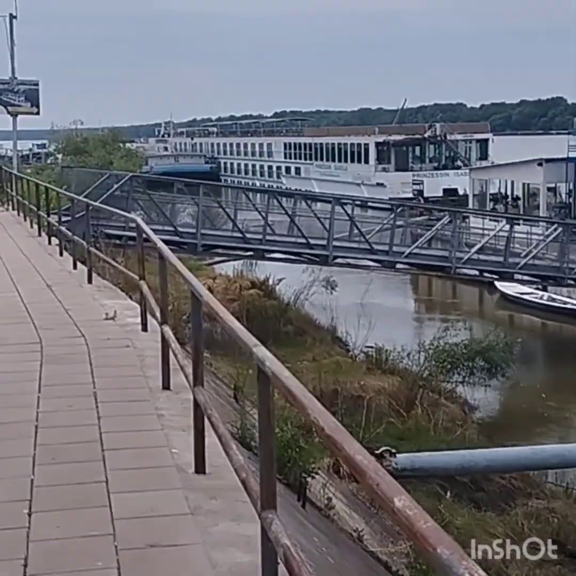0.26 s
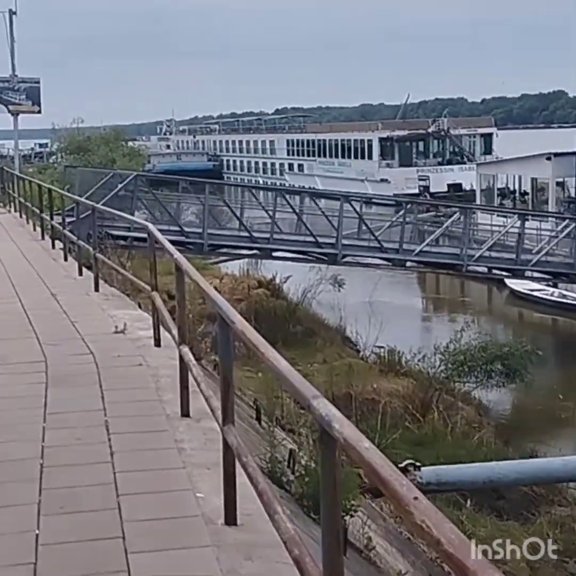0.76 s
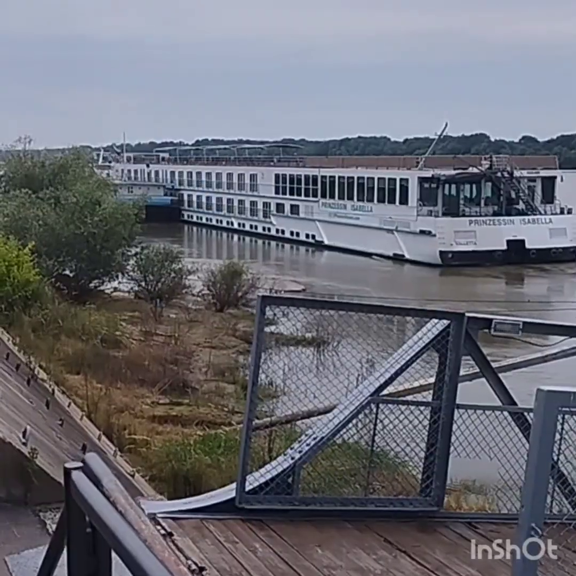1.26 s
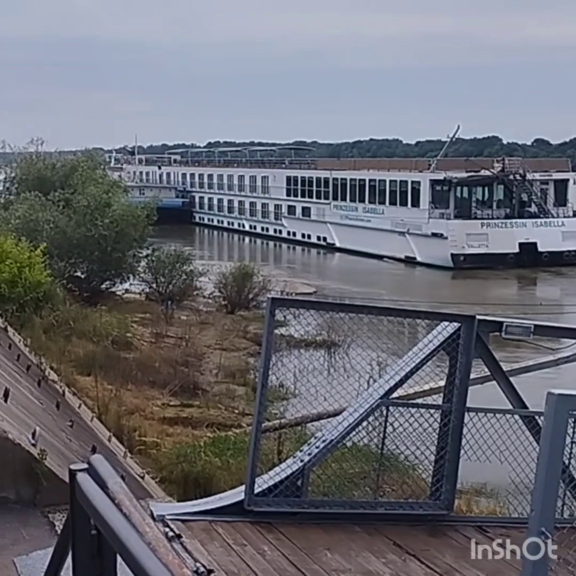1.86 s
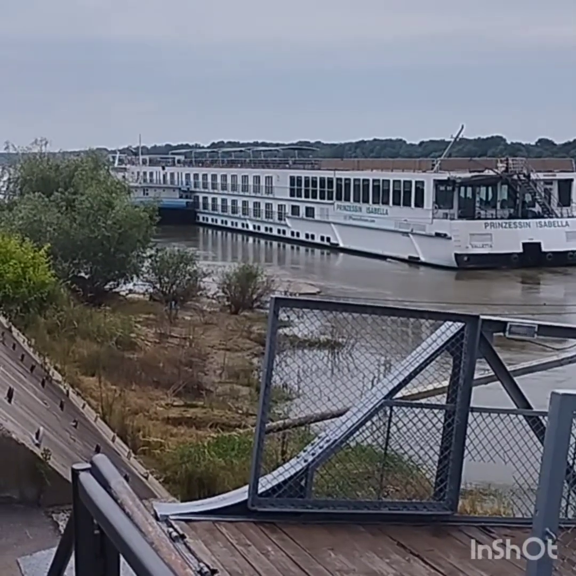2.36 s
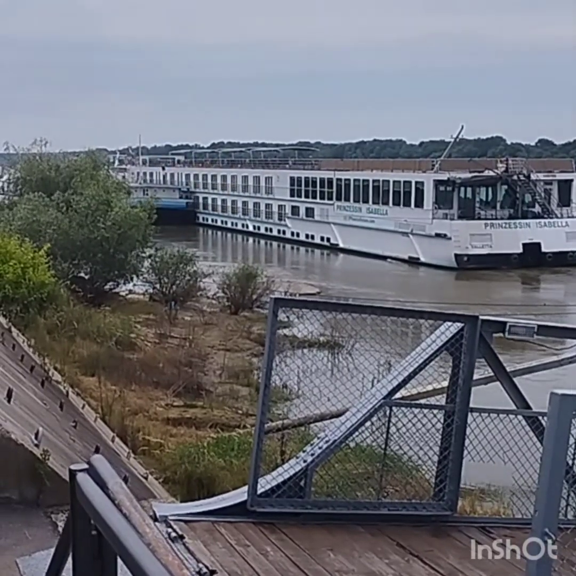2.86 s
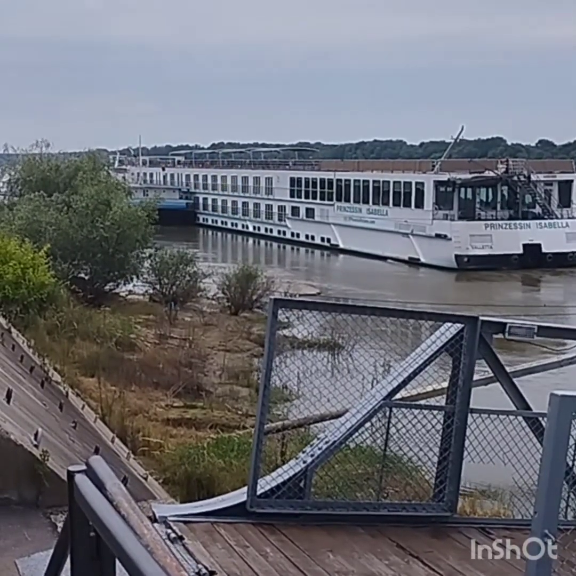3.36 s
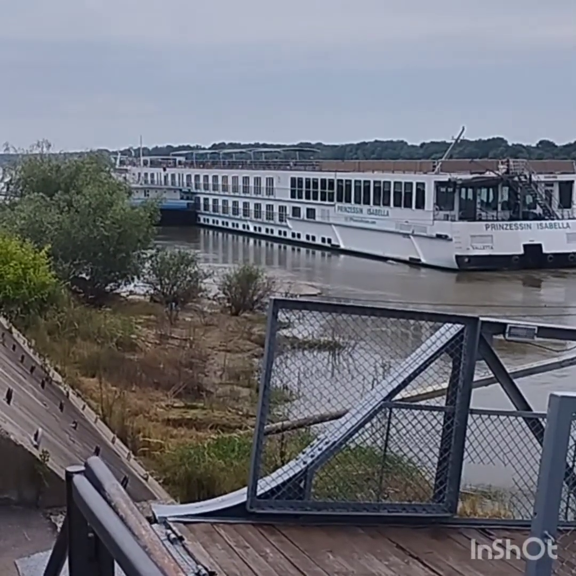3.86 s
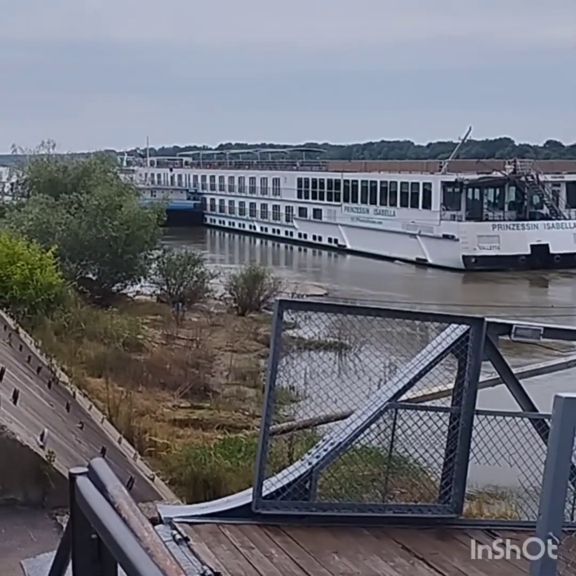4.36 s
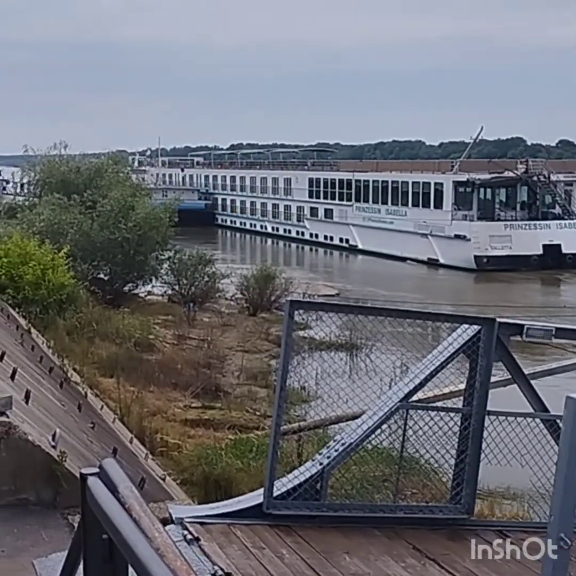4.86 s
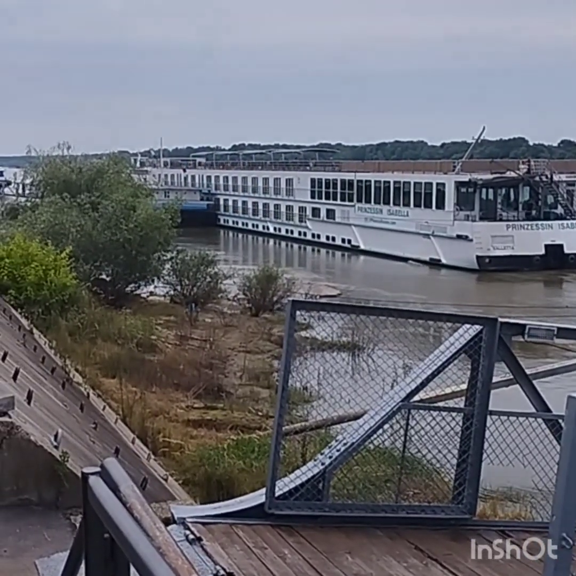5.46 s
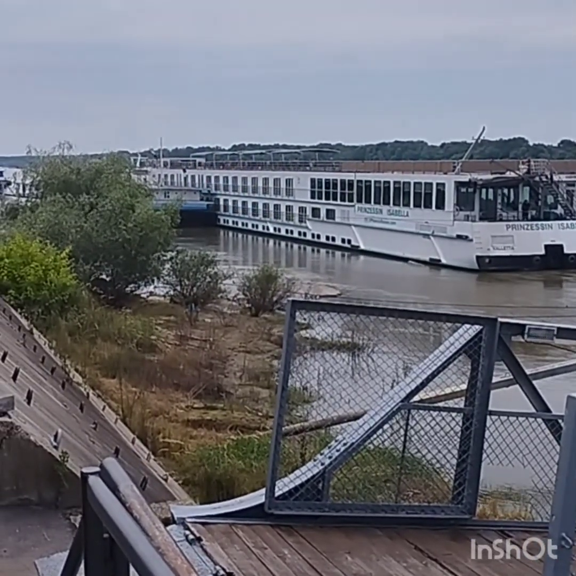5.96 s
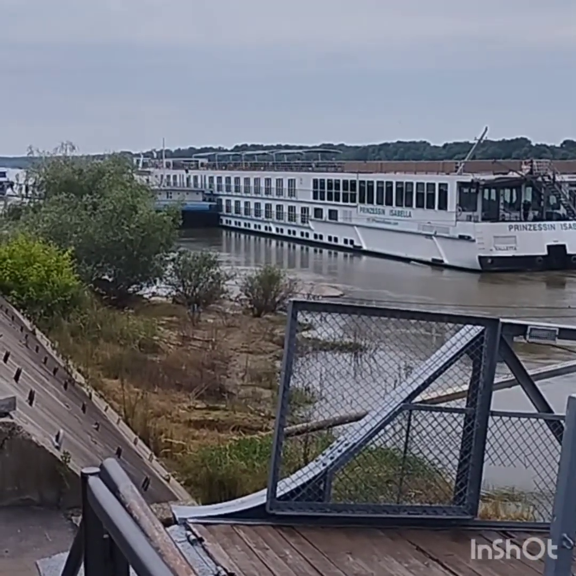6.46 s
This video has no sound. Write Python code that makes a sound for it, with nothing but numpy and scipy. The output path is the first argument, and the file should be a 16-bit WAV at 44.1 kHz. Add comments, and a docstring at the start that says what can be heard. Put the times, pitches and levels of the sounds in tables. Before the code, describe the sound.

Outdoors on a riverbank, strong wind thumps hard on a stereo microphone, nearly burying the faint drone of a moored ship. A dry tick and soft rustle pass nearby. Sound cuts abruptly to a short silence, then a closer, clearer ship drone swells in with airy hiss, lighter wind rumbling beneath. Past the middle comes a rattling knock with a rustle, and gusts strengthen to the end.

```python
"""From the start a moored river ship drones far across the water: noise through duct resonances, vent hiss
and steady tones. Gusts (bursts of eddies) and thumps (single big eddies) buffet two microphone ports.
Dry ticks and a soft rustle come close by; at 0.79 s all cuts to silence. From 0.96 s a nearer stretch fades
in: the ship swells up, then wind and low tones enter; later come soft rustles and a rattling, ringing knock."""
import sys
import numpy as np
from scipy import signal
from scipy.fft import rfft, irfft, next_fast_len
from scipy.io import wavfile

SR = 44100
rng = np.random.default_rng(int(sys.argv[2]) if len(sys.argv) > 2 else 0)


def file_out(sig):
    """Save sig as 16-bit WAV at sys.argv[1]."""
    # one column per channel
    cols = np.atleast_2d(sig).T
    # limit, then scale
    lim = np.clip(cols, -1, 1)
    pcm = np.round(lim * 32767).astype(np.int16)
    wavfile.write(sys.argv[1], SR, pcm)


N = 295558
TIME, PADDED = np.arange(N) / SR, next_fast_len(N)
HZ = np.maximum(np.arange(PADDED // 2 + 1) * SR / PADDED, 1)
CUT_S = 0.7928   # end of the far stretch
LEFT_LAG_S = 0.00008


def from_db(db):
    """Gain of a level in dB."""
    return 10 ** (np.asarray(db) / 20)


def rms_one(x):
    """Each channel scaled to rms 1."""
    return x / np.sqrt(np.mean(x ** 2, axis=-1, keepdims=True) + 1e-20)


def in_time(rows):
    """Table columns as curves over time."""
    s, *columns = np.transpose(rows)
    return np.array([np.interp(TIME, s, c) for c in columns])


def at_hz(points, hz, axis=1):
    """One column of a table read on a log-frequency axis."""
    return np.interp(np.log(hz), np.log(np.array(points)[:, 0]), np.array(points)[:, axis])


def panned(pan_db):
    """Left and right gains for an L-R difference; total power stays."""
    gains = from_db(np.multiply.outer([.5, -.5], pan_db))
    return gains / np.sqrt(np.mean(gains ** 2, axis=0))


def drift(rate_hz, channels=1):
    """Slow chance of spread 1: sparse noise through a double one-pole low-pass."""
    step = 40   # samples between draws
    warmup = 2000   # draws dropped while the filter settles
    r = np.exp(-2 * np.pi * rate_hz * step / SR)
    draws = rng.standard_normal((channels, N // step + warmup + 2))
    slow = rms_one(signal.lfilter([1], [1, -2 * r, r * r], draws)[:, warmup:])
    return np.array([np.interp(np.arange(N) / step, np.arange(len(s)), s) for s in slow])


def ring(clicks, hz, t60_s):
    """Two-pole resonator: a unit click sets a decaying sine of height 1 ringing."""
    r, w = from_db(-60 / (t60_s * SR)), 2 * np.pi * hz / SR
    return signal.lfilter([0, np.sin(w)], [1, -2 * r * np.cos(w), r * r], clicks + 1e-18)


def distant_noise(gain):
    """Stereo noise of a given spectrum: a shared part, late at the left port, and a part of each port's own."""
    # left-right likeness: (frequency [Hz], shared share of power [0..1])
    likeness = [(100, 0.91), (520, 1), (890, 0.91), (1200, 0.92), (1600, 0.86), (2400, 0.67), (4000, 0.47),
                (7000, 0.23)]
    shared, left, right = rfft(rng.standard_normal((3, N)), PADDED)
    alike = np.clip(at_hz(likeness, HZ), 0, .999)
    late = np.exp(-2j * np.pi * HZ * LEFT_LAG_S)
    common = np.sqrt(alike) * shared * [late, np.ones_like(late)]
    own = np.sqrt(1 - alike) * np.array([left, right])
    return irfft(gain * (common + own), PADDED)[..., :N]


def late_bass_db():
    """Level offset: after the cut it holds the bass faint, then lets it in fast."""
    enters_s, before_db, entry_s = 1.095, -15, 0.011
    return before_db * (TIME > CUT_S) * np.clip(1 - (TIME - enters_s) / entry_s, 0, 1)


def drone(stretch, waver_db=0.8, waver_hz=7.0):
    """Exhaust and fan roar coloured by ducts that waver singly; low and upper part. Stretch 0 far, 1 near."""
    # broad roar under the resonances: (frequency [Hz], far density [dB per Hz], near density [dB per Hz])
    roar_points = [(39.8, -15.5, -4.5), (145, -11.5, -5.5), (456, -14.5, -20), (1060, -14.5, -17.5),
                   (1550, -20, -20), (1820, -21.5, -18.5), (2630, -28, -37), (3100, -53, -66)]
    # funnel and duct resonances: (centre [Hz], width [Hz], far level [dB], near level [dB])
    ducts = [(357, 36, -29, -10.5), (531.7, 50, -7.5, 3.5), (578, 22, -2.5, 0.5), (605, 43, -13, -4),
             (666.7, 33, -23.5, -2), (712, 70, -12.5, -4.5), (789.6, 50, -5.5, -8.5), (1090, 30, -13, -32),
             (1161.4, 54, -8, -6), (1213.5, 56, -6.5, 1), (1260, 78, -12.5, -10), (1319, 26, -20, -8),
             (1663, 180, -13, -18.5), (1838, 45, -28.5, -18), (1926, 64, -21.5, -16.5),
             (2172, 100, -21, -23), (2288, 53, -28.5, -26), (2630, 110, -29.5, -32.5)]
    # slow swells of two groups of ducts: (time [s], whine level [dB], upper edge level [dB])
    swells = [(1.1, -1, -1.5), (1.65, 5.5, 1), (2.1, 0.5, -1.5), (2.7, 3.5, 2), (3.4, 2.5, -3.5),
              (3.8, -3.5, -1), (4.6, -3.5, 5), (5.5, -3, 2), (6.1, -1, -4.5), (6.6, 1.5, 1)]
    # the two groups, whine and upper edge: (lowest centre [Hz], highest centre [Hz])
    swelling_hz = [(1880, 2050), (2050, 2450)]
    split_hz = 1400

    low = 1 / (1 + (HZ / split_hz) ** 20)
    roar = from_db(at_hz(roar_points, HZ, axis=1 + stretch)) ** 2
    peaks = [from_db(level_db[stretch]) ** 2 / (1 + (2 * (HZ - hz) / width_hz) ** 2) ** 2
             for hz, width_hz, *level_db in ducts]
    powers = np.array([roar * low, roar * (1 - low), *peaks])
    centres = np.array([0, SR, *np.array(ducts)[:, 0]])   # 0 and SR put the roars in the low and upper part

    swing_db = waver_db * drift(waver_hz, channels=len(powers))
    for (low_hz, high_hz), swell_db in zip(swelling_hz, in_time(swells)):
        swing_db[(centres > low_hz) & (centres < high_hz)] += stretch * swell_db

    gains = powers / np.sqrt(powers.sum(axis=0))   # without swing they add up to the root of total power
    parts = from_db(swing_db)[:, None] * distant_noise(gains[:, None])
    is_low = centres < split_hz
    return rms_one(np.array([parts[is_low].sum(axis=0), parts[~is_low].sum(axis=0)]))


def vent():
    """Vent hiss: distant noise shaped to a broad treble hump, rms 1."""
    # (frequency [Hz], density [dB per Hz])
    vent_points = [(2000, -47.5), (2500, -6), (3000, 0.5), (3950, 2.5), (4700, -0.5), (5400, -8),
                   (6400, -15), (7400, -22.5), (9000, -42.5)]
    return rms_one(distant_noise(from_db(at_hz(vent_points, HZ))))


def tones():
    """Steady machine tones whose strength wavers with the air."""
    # two machines, one near multiples of 49 Hz and one of 63 Hz: frequency [Hz]
    tone_hz = [49.5, 63, 126, 293.7, 979.3, 1468.7]
    # a row per tone: (far rms [dB], near rms [dB], L-R [dB], waver [dB])
    tone_levels = [(-37.5, -40.5, -1, -0.5), (-39.5, -47, -5, 3), (-38.5, -43, -2.5, -1),
                   (-45.5, -46, -1.5, 2.5), (-63.5, -63, 5, 4), (-67.5, -63.5, 7, 1.5)]
    lag_s = np.array([[3 * LEFT_LAG_S], [0]])
    turn = 2 * np.pi * (TIME + 0.000088 * drift(0.47)[0] - lag_s)   # slow timing drift shared by all tones
    out = 0
    for hz, (far_db, near_db, pan_db, waver_db) in zip(tone_hz, tone_levels):
        level_db = np.where(TIME < CUT_S, far_db, near_db) + waver_db * drift(2.8)
        level_db = level_db + .5 * (hz < 200) * late_bass_db()
        sine = np.sqrt(2) * np.sin(hz * turn + rng.uniform(0, 2 * np.pi))
        out = out + from_db(level_db) * panned(pan_db)[:, None] * sine
    return out


def ship():
    """Drone and vent hiss flicker a little on their way over the water; steady tones join them."""
    # near stretch: (time [s], low drone [dB], upper drone [dB], vent hiss [dB])
    near_levels = [(1.1, -37.5, -47, -62), (1.35, -37, -49.5, -59.5), (1.75, -36.5, -48.5, -62.5),
                   (2.2, -35.5, -47, -60.5), (2.6, -36.5, -46.5, -59.5), (3.1, -37, -47, -59.5),
                   (3.55, -37.5, -49, -64), (3.95, -37, -50, -63), (4.45, -38, -49, -63),
                   (4.9, -38, -51, -62.5), (5.4, -37.5, -46.5, -60), (5.85, -37, -49, -61),
                   (6.25, -38, -48, -65), (6.7, -38.5, -49, -62)]
    far_db = [[-48], [-57], [-67]]   # low drone, upper drone, vent hiss; steady
    swell_db_per_s = 44   # up to the first near level
    far = TIME < CUT_S
    near_db = in_time(near_levels) + swell_db_per_s * np.minimum(TIME - near_levels[0][0], 0)
    low_db, upper_db, vent_db = np.where(far, far_db, near_db)
    low, upper = np.where(far, drone(0), drone(1))
    low = low * from_db(low_db + 0.28 * drift(4.2))
    upper = upper * from_db(upper_db + 1.0 * drift(2.0))
    hiss = vent() * from_db(vent_db + 0.74 * drift(30))
    return low + upper + hiss + tones()


def wind(eddies_per_s=140.0, uneven_db=3.5, lumpy_db=2.0, gusty_hz=2.4, own_db=1.8, smooth_hz=520):
    """Eddies burst on each port alone; every size rings about one cycle."""
    # (time [s], left rumble [dB], right rumble [dB], flutter [dB])
    gusts = [(0.0, -12, -21, -30.5), (.1, -24, -16, -32), (.2, -13, -20.5, -22.5), (.27, -20, -17.5, -30),
             (.33, -34, -18, -29), (.38, -25.5, -25, -35), (.46, -26, -32.5, -33), (.54, -25, -28, -35.5),
             (.62, -21.5, -28, -32), (.7, -21.5, -21, -39.5), (.78, -24, -11, -33), (1.11, -33, -23, -38.5),
             (1.35, -24, -27.5, -46.5), (1.5, -21.5, -18.5, -33.5), (1.7, -31, -33, -50),
             (1.95, -22.5, -23, -45.5), (2.2, -24.5, -27.5, -44.5), (2.4, -27, -31, -47),
             (2.58, -22, -25.5, -40), (2.8, -27.5, -23, -39.5), (3.1, -25.5, -26.5, -35),
             (3.22, -28, -25.5, -44), (3.45, -29, -29, -38.5), (3.7, -26, -28, -43.5),
             (3.93, -30, -32, -44.5), (4.06, -20, -24, -41.5), (4.14, -16.5, -20, -31.5),
             (4.22, -22, -29, -38.5), (4.3, -14, -18.5, -26), (4.42, -21.5, -26, -38),
             (4.6, -17.5, -18, -37.5), (4.8, -26, -26, -43), (5.05, -27, -26, -38.5),
             (5.3, -21, -22.5, -38.5), (5.5, -18, -22.5, -38), (5.7, -26, -24, -44),
             (5.95, -23.5, -20.5, -39.5), (6.12, -16, -26.5, -41.5), (6.3, -17.5, -16.5, -40.5),
             (6.5, -20.5, -27, -36.5), (6.7, -25, -34, -47)]
    # eddy sizes: (frequency [Hz], level [dB], share that follows the flutter; above 1 it outgrows the flutter)
    eddies = [(19.6, -8.5, 0.047), (38, -10, 0.13), (57.3, -8.5, 0.047), (96.3, -10, 0.21), (164, -5, 0.9),
              (243, -8.5, 0.82), (437, -20.5, 1.58)]
    flutter_pan_db, flutter_leans = -3, 0.42   # L-R; share of the rumble's lean that it follows

    left_db, right_db, both_db = in_time(gusts)
    rumble_db = np.array([left_db, right_db]) + own_db * drift(gusty_hz, channels=2)
    lean_db = flutter_pan_db + flutter_leans * (left_db - right_db)
    flutter_db = both_db + np.multiply.outer([.5, -.5], lean_db) + own_db * drift(gusty_hz, channels=2)
    gusty_db = flutter_db - np.mean(flutter_db)

    born = rng.random((2, N)) < eddies_per_s / SR
    sizes = from_db(uneven_db * np.minimum(rng.exponential(1, (2, N)), 4))
    signs = np.sign(rng.random((2, N)) - .4)
    bed = 0.047 * rng.standard_normal((2, N))   # the weakest eddies merge into noise
    dull = signal.butter(2, smooth_hz, fs=SR, output="sos")   # air has no sharp edges
    soft = signal.sosfilt(np.vstack([dull, dull, dull]), born * sizes * signs + bed)

    out = 0
    for k, (hz, size_db, share) in enumerate(eddies):
        band = signal.butter(1, [hz / 1.33, hz * 1.33], "band", fs=SR, output="sos")
        puffs = rms_one(signal.sosfilt(np.vstack([band, band]), soft)) * (-1) ** k   # neighbours add, not cancel
        low = np.clip(1 - share, 0, 1)
        level_db = size_db + low * rumble_db + (1 - low) * flutter_db + max(share - 1, 0) * gusty_db
        out = out + puffs * from_db(level_db)
    return from_db(late_bass_db() + lumpy_db * drift(14, channels=2)) * out


def thumps():
    """A big eddy swells and dies, mostly on one port; it leaves no lasting pressure."""
    # strongest eddies: (time [s], level [dB], pitch [Hz], length at half height [cycles], port)
    big_eddies = [(.017, -20, 220, 1.2, "L"), (0.02, -26, 300, 0.75, "R"), (0.035, -20, 105, 1.7, "R"),
                  (0.039, -16.5, 104, 2.4, "L"), (.099, -20, 115, 1.3, "R"), (0.191, -24, 161, 0.75, "R"),
                  (0.277, -21, 190, 1.2, "L"), (0.33, -28.5, 400, 1.6, "R"), (0.391, -19, 113, 0.8, "L"),
                  (0.476, -16.5, 115, 0.92, "R"), (0.618, -12, 140, 0.72, "L"),
                  (.655, -17.5, 115, 1.4, "R"), (0.674, -18, 131, 0.66, "L"), (0.771, -19, 110, 0.62, "R"),
                  (1.445, -24, 139, 0.91, "L"), (1.748, -19.5, 120, 0.75, "R"),
                  (2.313, -21.5, 140, 0.73, "L"), (2.543, -21.5, 120, 1.3, "R"),
                  (2.681, -22, 130, 0.89, "R"), (3.098, -21, 180, 0.88, "both"),
                  (3.11, -22, 423, 0.46, "both"), (4.187, -19, 120, 0.61, "R"),
                  (4.205, -18, 109, 0.71, "L"), (4.323, -18.5, 170, 0.56, "R"),
                  (4.277, -16.5, 109, .6, "R"), (4.309, -21, 170, 1.2, "R"), (4.337, -20, 80, 0.47, "R"),
                  (4.521, -17, 182, 0.73, "R"), (4.582, -19.5, 150, 0.89, "R"), (4.605, -24, 94, 1.7, "L"),
                  (5.038, -17, 140, 0.69, "R"), (5.107, -19.5, 140, 0.85, "R"),
                  (5.222, -22.5, 108, 2.8, "L"), (5.464, -20.5, 115, 1.1, "R"),
                  (5.487, -20.5, 170, 0.79, "R"), (5.911, -21.5, 141, 0.99, "R"),
                  (6.134, -16, 130, 0.71, "R"), (6.229, -17.5, 150, 0.48, "R"),
                  (6.279, -17.5, 150, 0.9, "L"), (6.335, -18.5, 115, 1.4, "L"),
                  (6.354, -20.5, 125, 0.58, "L"), (6.411, -20, 145, 0.72, "R"),
                  (0.128, -7.5, 141, 0.43, "R"), (0.165, -6, 120, 0.53, "R"), (0.209, -19.5, 227, 1.3, "L"),
                  (0.224, -15, 206, 1.2, "R"), (0.284, -10.5, 135, 0.62, "R"),
                  (0.324, -10.5, 123, 1.3, "R"), (0.595, -7.5, 179, 0.5, "L"),
                  (0.738, -18.5, 109, 1.1, "R"), (1.52, -15, 105.5, 0.91, "R"),
                  (1.575, -15, 101, 0.78, "R"), (2.826, -16, 116, 0.73, "R"), (3.06, -16, 105, 0.81, "R"),
                  (3.089, -26, 290, 1.5, "both"), (3.107, -25, 217, 2.7, "both"),
                  (3.119, -27, 338, 2.3, "both"), (3.724, -14.5, 111, 0.78, "R"),
                  (4.146, -14.5, 123, 0.61, "R"), (4.258, -12.5, 114, 0.66, "R"),
                  (4.292, -12.5, 220, 0.52, "R"), (4.328, -20.5, 100, 1.7, "L"),
                  (4.443, -18.5, 94, 1.4, "L"), (4.502, -17.5, 157, 2.2, "R"),
                  (4.648, -15.5, 142, 0.84, "R"), (4.679, -15, 145, 0.88, "R"),
                  (4.967, -14, 108, 0.49, "L"), (5.855, -18.5, 134, 1.03, "R"),
                  (6.126, -12.5, 90.5, 1.1, "L"), (6.182, -13.5, 110, 0.51, "L"),
                  (6.377, -15.5, 117, 0.42, "R"), (6.488, -14.5, 154, 0.8, "L")]
    # port: L-R [dB]
    port_pan_db = {"L": 31, "R": -36.5, "both": 3}
    out, chance = np.zeros((2, N)), rng.random((len(big_eddies), 2))
    for (s, level_db, hz, cycles, port), (lean, suck) in zip(big_eddies, chance):
        width_s = max(cycles, .3) / hz
        half = round(1.6 * width_s * SR)
        t = np.arange(-half, half) / SR
        swell = .5 ** ((2 * t / width_s) ** 2)
        puff = swell * np.cos(2 * np.pi * hz * t + lean - .5) * np.sign(suck - .35)
        puff = puff - swell * np.sum(puff) / np.sum(swell)   # zero net pressure
        gains = from_db(level_db) * panned(port_pan_db[port])
        out[:, round((s + t[0]) * SR):][:, :len(t)] += gains[:, None] * puff
    return out


def ticks():
    """Dry ticks: a softened click rings for a millisecond."""
    # (time [s], level [dB], pitch [Hz], L-R [dB])
    tick_rows = [(0.0711, -29, 4400, -20), (.6735, -43, 5430, -10)]
    out = np.zeros((2, N))
    soft = signal.butter(2, 7500, fs=SR, output="sos")
    for s, level_db, hz, pan_db in tick_rows:
        click = 1.0 * (np.arange(N) == round(s * SR))
        tick = ring(signal.sosfilt(soft, click), hz, 0.001)
        out += from_db(level_db) * panned(pan_db)[:, None] * tick
    return out


def rustles(crackle_db=3.5):
    """Soft short bursts of band noise close by, unlike at the two ports, uneven as rubbing is."""
    # (time [s], level [dB], centre [Hz], width [Hz], rise [s], t60 [s])
    rustle_rows = [(.215, -64, 5560, 3200, 0.065, 0.1), (3.474, -64.5, 5700, 2000, .004, 0.23),
                   (4.117, -52, 4000, 3800, .004, 0.24)]
    out, longest = np.zeros((2, N)), 9000   # samples
    for s, level_db, hz, width_hz, rise_s, t60_s in rustle_rows:
        t = np.arange(round((rise_s + t60_s) * SR))[:longest] / SR
        edges_hz = [max(hz - width_hz / 2, 100), hz + width_hz / 2]
        band = signal.butter(2, edges_hz, "band", fs=SR, output="sos")
        burst = rms_one(signal.sosfilt(np.vstack([band, band]), rng.standard_normal((2, len(t)))))
        burst = burst * from_db(crackle_db * drift(160)[:, :len(t)])
        shape = np.minimum(t / rise_s, 1) * from_db(-60 * np.maximum(t - rise_s, 0) / t60_s)
        out[:, round(s * SR):][:, :len(t)] += from_db(level_db) * shape * burst
    return out


def knock(touch_s=0.0015):
    """A knock rattles in a few touches: decaying noise, unlike at the ports, drives ringing modes."""
    # (time [s], level [dB])
    touch_rows = [(4.119, -1), (4.1223, 0.5), (4.128, -4), (4.135, -8), (4.141, -10), (4.148, -13.5)]
    # ringing modes: (frequency [Hz], level [dB], t60 [s])
    modes = [(1870, -47, .02), (2610, -47, 0.022), (2890, -37, 0.023), (4120, -38, 0.019),
             (4950, -45, .015), (5660, -44, 0.016), (6540, -58, .012), (9300, -66, .002),
             (12300, -60, .002)]
    since = TIME - np.array(touch_rows)[:, :1]
    decays = (since > 0) * np.exp(-np.abs(since) / touch_s)
    touches = from_db(np.array(touch_rows)[:, 1]) @ decays
    scuff = panned(-1.5)[:, None] * rng.standard_normal((2, N)) * touches / np.sqrt(touch_s * SR / 2)
    out = 0
    for hz, level_db, t60_s in modes:
        rung = ring(ring(scuff, hz, t60_s), hz, t60_s / 4)   # the second, shorter ring softens the onset
        out = out + from_db(level_db) * rung * 50 / (t60_s * SR)
    return out


def scene():
    """Ship, wind on the ports and small near sounds."""
    return ship() + wind() + thumps() + ticks() + rustles() + knock()


def record(dry):
    """Microphone hiss, own in each channel; a hard cut to silence and a fade back in; the top is cut."""
    # hiss: (frequency [Hz], density [dB per Hz])
    hiss_points = [(5000, -9.5), (8000, -15.5), (11000, -13.5), (12200, -2.5), (14000, 4.5), (15700, -9.5)]
    hiss_db, resume_s, fade_s, cutoff_hz = -83, 0.96, 0.025, 15700
    white = rfft(rng.standard_normal((2, N)), PADDED)
    hiss = rms_one(irfft(from_db(at_hz(hiss_points, HZ)) * white, PADDED)[:, :N])
    wet = dry + from_db(hiss_db + 1.5 * drift(8.8, channels=2)) * hiss
    gate = np.where(TIME < CUT_S, 1, np.clip((TIME - resume_s) / fade_s, 0, 1))
    top_cut = signal.ellip(10, .5, 60, cutoff_hz, fs=SR, output="sos")
    return signal.sosfilt(top_cut, wet * gate)


dry = scene()
out = record(dry)
file_out(out)
```